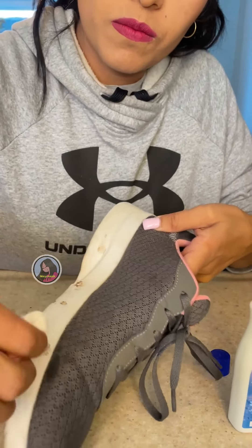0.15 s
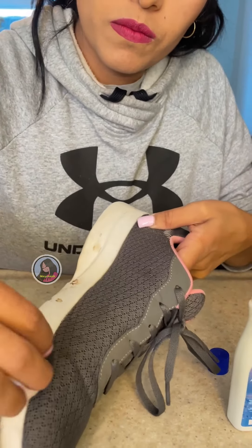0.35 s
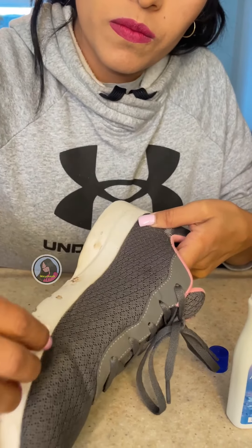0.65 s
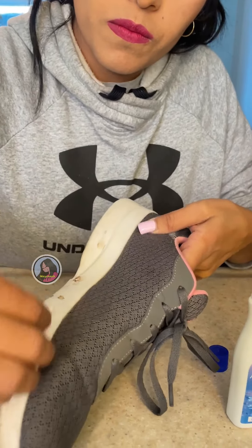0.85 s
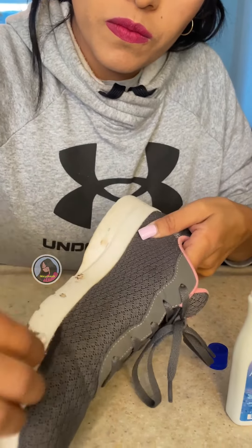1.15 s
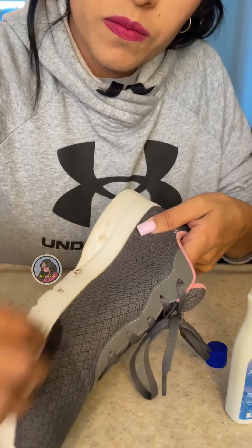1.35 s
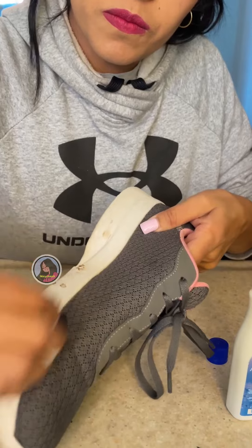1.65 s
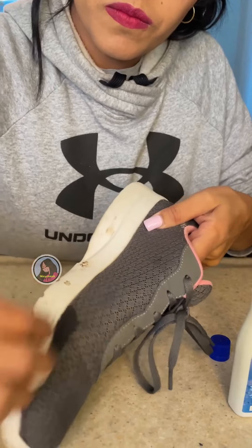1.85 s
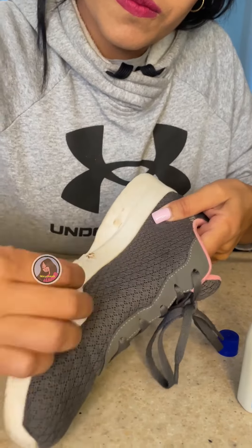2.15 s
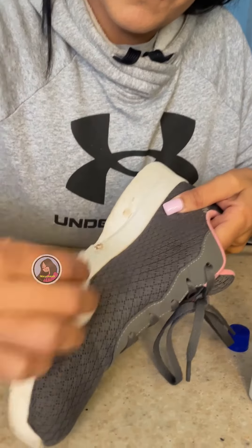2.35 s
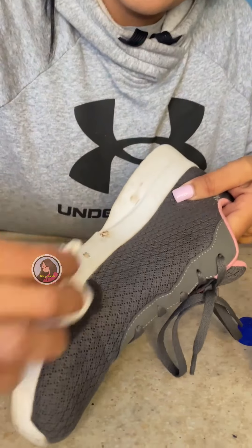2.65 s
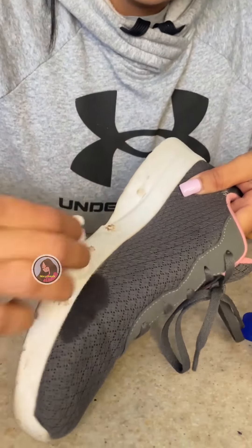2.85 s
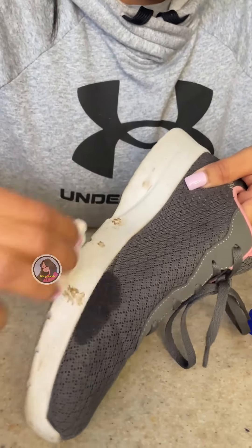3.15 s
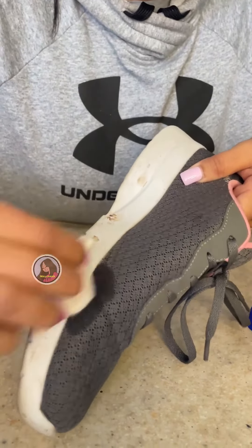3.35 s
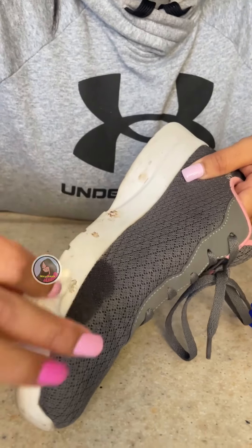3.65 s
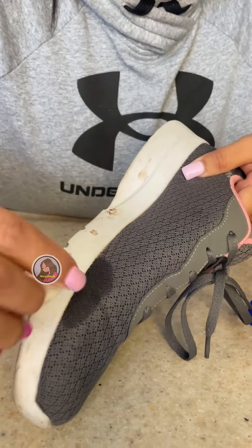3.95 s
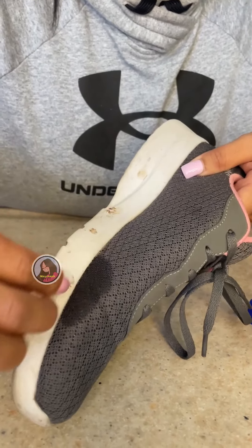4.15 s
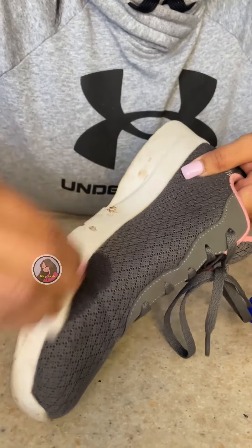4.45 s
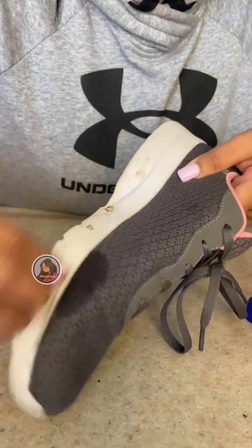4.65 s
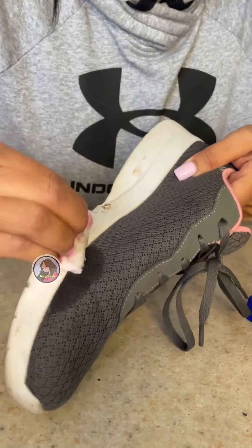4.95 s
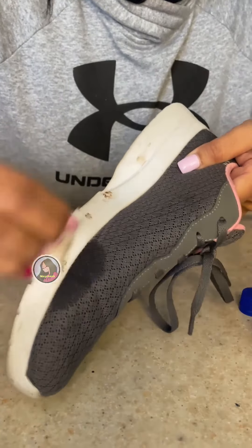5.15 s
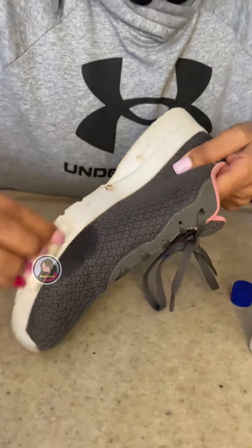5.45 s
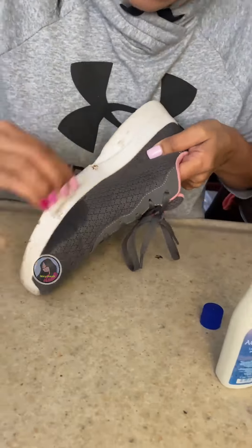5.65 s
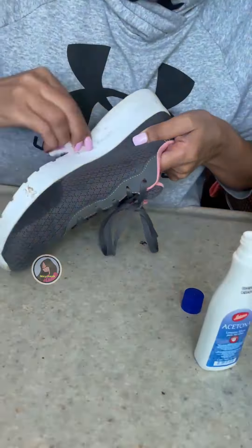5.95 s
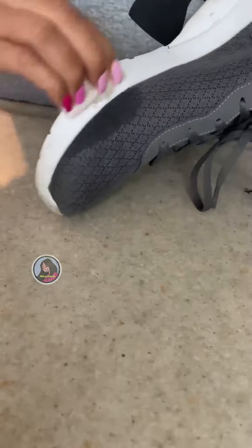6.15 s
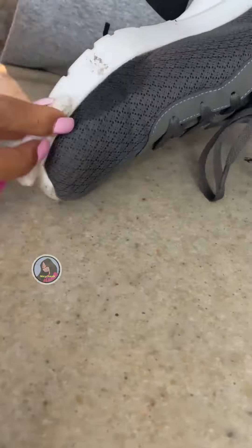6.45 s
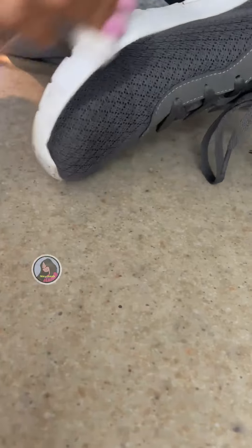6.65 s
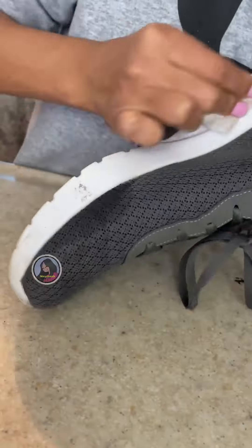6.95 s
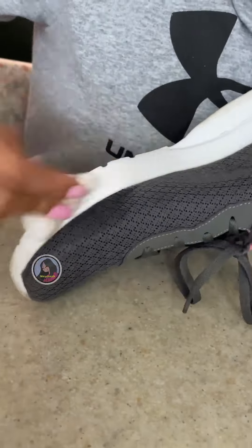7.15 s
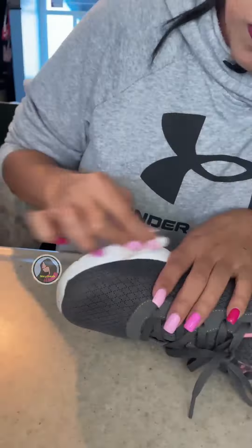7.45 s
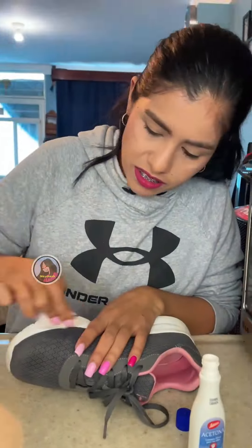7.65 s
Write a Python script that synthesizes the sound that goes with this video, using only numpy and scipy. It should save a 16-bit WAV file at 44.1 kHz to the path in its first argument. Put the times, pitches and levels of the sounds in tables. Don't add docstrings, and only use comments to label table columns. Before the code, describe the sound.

Close up in a kitchen, a cotton pad rubs a rubber shoe sole. A few hesitant wipes settle into an even scrub of about nine strokes a second, with small squeaks and low bumps. It breaks into uneven wipes, resumes, then jumps to sped-up, crowded scuffing with a strong thump and a brief lull. Faint fridge hum and room air sit behind; the close stereo microphone spreads wider near the end.

```python
import sys
import numpy as np
from scipy import signal
from scipy.fft import rfft, irfft, next_fast_len
from scipy.io import wavfile
from scipy.ndimage import uniform_filter1d, map_coordinates

SR = 44100
rng = np.random.default_rng(int(sys.argv[2]) if len(sys.argv) > 2 else 0)


def elevation(decibels):
    levels = np.asarray(decibels, float)
    return 10 ** (levels / 20)


def store_wav(level_fs):
    pcm = np.round(np.clip(np.atleast_2d(level_fs), -1, 1) * 32767)
    wavfile.write(sys.argv[1], SR, pcm.T.astype(np.int16))


N = 343980

CHANGE_S = 5.092
SIZE = next_fast_len(N)
HZ = np.maximum(np.arange(SIZE // 2 + 1) * SR / SIZE, 1)
TIME = np.arange(N) / SR
AFTER = TIME >= CHANGE_S
# (time [s], level [dB])
QUICK_SHOVES = [(5.24, -29.5), (5.68, -38), (5.92, -31.5), (6.11, -31), (6.52, -38), (6.73, -32),
                (6.89, -29), (7.08, -29), (7.19, -24.5), (7.32, -23), (7.412, -16), (7.432, -13),
                (7.49, -20), (7.535, -9.5), (7.572, -17), (7.665, -24)]
QUICK_RISE_DB_S, QUICK_FALL_DB_S = 400, 300


def along(table, column=1):
    rows = np.array(table)
    return np.interp(TIME, rows[:, 0], rows[:, column])


def across(table, at=HZ):
    rows = np.array(table)
    return np.interp(np.log(at), np.log(np.maximum(rows[:, 0], 1)), rows[:, 1])


def unit(x):
    return x / np.sqrt(np.mean(x ** 2))


def colour(x, gain):
    return irfft(rfft(x, SIZE) * gain, SIZE)[..., :N]


def ring(hz, width_hz, at=HZ):
    return 1 / (1 + 1j * (at / hz - hz / at) * hz / width_hz)


def walk(rate, t=TIME):
    knots = rng.standard_normal(int(N / SR * rate) + 3)
    return map_coordinates(knots, [t * rate], order=1) * 1.05


def add(out, s, sound):
    i = int(s * SR)
    out[:, i:i + sound.shape[-1]] += sound[..., :N - i]


def strokes():
    # (time of turn [s], level at the turn [dB],
    # level under way [dB], place of top speed [0-1], pressure [dB])
    loose = [(0.0, -57, -40, .42, -28), (0.16, -42.5, -42, .44, -11.5), (0.292, -65, -45, .55, -22),
             (0.437, -50, -44, .43, -11.5), (0.566, -61, -50, .8, -28), (0.66, -43, -40.5, .5, -26),
             (0.701, -43, -39.5, .3, 0.5), (0.816, -46, -36.5, .58, -1.5), (0.945, -46, -33.5, .54, -10),
             (2.872, -44.5, -30.5, .45, -8), (2.998, -50.5, -58, .5, -12), (3.058, -51, -34, .5, -4.5),
             (3.162, -62, -37, .49, -11.5), (3.278, -50, -56, .21, -23), (3.34, -65, -37.5, .55, -2.5),
             (3.425, -56.5, -36, .43, -8.5), (3.554, -47, -43, .16, -15), (3.615, -69, -71, .64, -8),
             (3.707, -80, -58, .58, -15), (3.79, -50.5, -45.5, .3, -9), (3.983, -82, -64, .37, -28),
             (4.07, -51.5, -49, .52, -17), (4.172, -59, -35, .55, -12), (4.326, -43.5, -31, .6, -12.5)]
    # (time of turn [s], level under way [dB])
    steady = [(1.077, -31.5), (1.195, -30.5), (1.31, -30.5), (1.419, -31), (1.532, -29.5), (1.634, -31),
              (1.744, -31.5), (1.856, -29.5), (1.965, -30.5), (2.075, -30), (2.183, -30), (2.299, -30),
              (2.412, -30.5), (2.526, -28.5), (2.632, -31.5), (2.755, -28.5), (4.438, -29.5), (4.55, -31),
              (4.656, -28), (4.771, -30), (4.878, -28.5), (4.99, -31.5)]
    steady_turn_db = -49.5
    # (time of turn [s], level at the turn [dB],
    # level under way [dB])
    quick = [(5.095, -35.5, -26.5), (5.124, -45, -34), (5.166, -41.5, -34), (5.208, -40, -33.5),
             (5.253, -39.5, -36.5), (5.283, -38, -34), (5.325, -42, -36.5), (5.373, -40.5, -34),
             (5.405, -38.5, -37), (5.458, -39.5, -36), (5.49, -41, -32.5), (5.525, -37, -35),
             (5.557, -41, -36.5), (5.625, -39, -35), (5.675, -38, -33), (5.707, -39.5, -39.5),
             (5.742, -47, -52), (5.768, -49, -36), (5.829, -39.5, -35), (5.939, -39.5, -39),
             (6.029, -42.5, -36), (6.074, -50, -35.5), (6.136, -46, -35.5), (6.173, -42, -40.5),
             (6.251, -47.5, -38.5), (6.283, -39.5, -37), (6.405, -36.5, -35), (6.495, -35, -35.5),
             (6.58, -36, -36.5),
             (6.641, -73, -58), (6.702, -75, -62), (6.785, -55, -30), (6.904, -37, -32.5),
               (6.944, -40.5, -32.5), (6.987, -42, -30), (7.069, -34.5, -32), (7.101, -40, -31.5),
               (7.141, -35.5, -35), (7.16, -35.5, -36), (7.239, -48.5, -36.5), (7.351, -35, -33),
               (7.462, -43, -32), (7.516, -50, -31), (7.583, -30.5, -28), (7.678, -37, -29.5),
               (7.76, -45, -42), (7.8, -36, -40)]
    # (time [s], level [dB])
    weight = [(1.08, -42), (1.9, -36.5), (2.55, -34.5), (2.8, -36.5), (4.4, -38), (5.05, -38.5),
              (5.18, -45), (5.48, -39), (5.72, -42.5), (6.02, -46.5), (6.28, -41.5), (6.6, -45),
              (6.92, -39.5), (7.2, -41), (7.4, -43), (7.6, -38.5)]

    regular = [(s, steady_turn_db, db) for s, db in steady] + quick
    turn, rest_db, top_db = np.transpose(regular)
    place = 0.49 + .003 * np.diff(rest_db, append=rest_db[-1])
    press_db = np.minimum(np.interp(turn, *np.transpose(weight)) - top_db, 3)
    rows = np.vstack([loose, np.c_[turn, rest_db, top_db, place, press_db]])
    return rows[np.argsort(rows[:, 0])].T


def pad_motion():
    turn, rest_db, top_db, place, press_db = strokes()
    k = np.clip(np.searchsorted(turn, TIME) - 1, 0, len(turn) - 2)
    length = turn[k + 1] - turn[k]
    halt = np.minimum(0.0087, 0.093 * length)
    out = (k % 2 == 0) & ~AFTER
    wait = out * 0.0047
    u = np.clip((TIME - turn[k] - halt - wait) / (length - 2 * halt - wait), 0, 1)
    lean = np.log(.5) / np.log(np.clip(.5 + 1.32 * (place[k] - .5), .1, .9))
    arch = np.abs(np.sin(np.pi * u ** lean)) ** np.where(out, 0.45, 0.73)
    rest = elevation(np.interp(TIME, turn, rest_db))
    speed = rest + np.maximum(elevation(top_db[k] - 0.18) - rest, 0) * arch
    spot = (u - .5) * (-1.) ** k
    press = elevation(press_db[k])
    return uniform_filter1d(speed, size=130), spot, uniform_filter1d(press, size=1400)


def scrub():
    # (frequency [Hz], density [dB per Hz])
    pad_slow = [(500, -30), (900, -16), (1700, -8.5), (2300, -4.5), (3000, -5), (4300, -4.5), (5000, -1),
                (5250, -2), (6200, -1.5), (8500, -3), (11500, -4.5), (13800, -10), (15300, -13),
                (15600, -7)]
    # (frequency [Hz], density [dB per Hz])
    pad_fast = [(300, -40), (450, -8), (700, -2.5), (818, -12), (1100, -1), (1260, -10.5), (2080, -9),
                (4540, -7), (6110, -5), (9630, -4), (12200, -5.5), (15600, -12.5)]
    # (frequency [Hz], width [Hz], level [dB])
    sole_slow = [(1214, 88, 9.5), (1025, 114, 5.5), (1310, 120, -2.5), (1800, 340, -2.5), (2280, 580, -12)]
    # (frequency [Hz], width [Hz], level [dB])
    sole_fast = [(1100, 210, 6.4), (1400, 380, 1.3)]
    # (frequency [Hz], width [Hz], level [dB])
    sole_edge = [(3140, 200, -16), (4240, 250, 0), (5325, 250, 2), (7300, 510, -5.5)]

    speed, spot, press = pad_motion()
    slips = rng.standard_normal((2, N)) * elevation(1.6 * rng.exponential(size=(2, N)))
    slips = slips * elevation(1.55 * walk(150))
    f, t, spec = signal.stft(unit(slips), SR, nperseg=512)
    f = np.maximum(f, 1)[:, None]
    i = np.minimum(t * SR, N - 1).astype(int)
    after = AFTER[i]

    slow, fast = elevation(across(pad_slow, f)), elevation(across(pad_fast, f))
    hiss = np.where(after, unit(fast), unit(slow))
    hiss = hiss * (press[i] / elevation(-8.0)) ** (.5 / (1 + (f / 3000) ** 4))
    hiss = hiss * np.clip(speed[i] / elevation(-32.5), .05, 1) ** (0.4 / (1 + (11000 / f) ** 4))

    def modes(table, wander, slide, swell_db):
        power = 0
        for hz, width, db in table:
            swell = elevation(db + swell_db * walk(14, t))
            pitch = hz * (1 + wander * walk(8.2, t) + slide * spot[i])
            power = power + np.abs(swell * ring(pitch, width, f)) ** 2
        return power

    sole = np.where(after, modes(sole_fast, 0.027, .03, 1.6), modes(sole_slow, .03, 0.12, 1.8))
    edge = np.where(after, .4, 1.1) * modes(sole_edge, 0.012, 0.03, 2.4)
    power = hiss ** 2 * (1 + edge) + (elevation(6.0) * press[i]) ** 2 * sole
    grain = rng.standard_normal((60, 200))
    patches = map_coordinates(grain, np.broadcast_arrays(f / 400, t[None] * 24), order=1)
    rubbed = signal.istft(spec * np.sqrt(power) * elevation(2.2 * patches), nperseg=512)[1][:, :N]
    return elevation(0.94) * speed * rubbed


def air():
    # (frequency [Hz], density [dB per Hz])
    air_tone = [(100, -4), (250, -8.5), (420, -18), (750, -24), (1000, -33), (1500, -43.5), (3000, -45.5),
                (6000, -55), (10000, -48), (15500, -59)]
    # (time [s], level [dB])
    handling = [(0, -40.5), (.3, -56), (.85, -48.5), (2.0, -51.5), (2.9, -47), (3.6, -53), (4.3, -49.5),
                (5.15, -46), (5.75, -53.5), (6.3, -48.5), (7.3, -46.5), (7.62, -28.5), (7.8, -36)]

    noise = rng.standard_normal((2, N))
    handling_db = along(handling)
    low_cut = HZ ** 2 / (HZ ** 2 + 190 ** 2)
    still = unit(colour(noise, elevation(across(air_tone)) * np.abs(ring(3100, 33000)) * low_cut))
    still = still * elevation(-45.5 + 1.16 * walk(7.9) + np.where(AFTER, -2.5, 0))
    boom = unit(colour(noise, np.abs(ring(83.3, 32)) ** 2))
    boom = boom * elevation(handling_db + 4.5 + 3.3 * walk(12))
    drone = unit(colour(noise, np.abs(ring(144.0, 77.4)) ** 2))
    drone = drone * elevation(-42.5 + 0.43 * (handling_db + 47.5) + 3.3 * walk(12))
    deep = unit(colour(noise, np.abs(ring(34, 24)) ** 3))
    shove_db = shoved(QUICK_SHOVES, QUICK_RISE_DB_S, QUICK_FALL_DB_S)
    deep = deep * elevation(np.where(AFTER, 0.6 * shove_db - 18.0, -52))
    return still + boom + drone + deep


def fridge():
    # (frequency [Hz], level [dB], start [s], stop [s])
    motor_lines = [(53.8, -30, 0, 5.09), (135, -42, 3.1, 5.3), (211, -50, 2, 5.1), (230, -48, 0, 2.4),
                   (320, -50, 2.9, 3.7), (419, -59, 0, 6), (472, -58, 0, 6), (512, -61, 0, 6),
                   (576, -51.5, 0, 6), (682, -62, 0, 6), (733, -60, 0, 6)]
    hum = 0
    for hz, db, start, stop in motor_lines:
        left_s = (stop - TIME) * min(30 / hz, 1) * 2
        on = np.clip(np.minimum(TIME - start + 0.11, left_s) / 0.12, 0, 1)
        shaky = min(hz / 300, 1)
        level = elevation(db + 3 + 1.24 * shaky * walk(6))
        hum = hum + on * level * np.sin(2 * np.pi * hz * TIME + (0.29 + 1.11 * shaky) * walk(5))
    return hum * elevation(np.array([[.2], [-.2]]))


def shoved(table, rise_db_s, fall_db_s):
    # (time [s], level [dB])
    tremble = [(0, -45), (5.09, -43.5), (5.1, -48), (5.35, -32.5), (5.65, -38.5), (6.5, -42.5), (7.3, -37),
               (7.8, -37)]
    total = elevation(along(tremble))
    for s, db in table:
        total = total + elevation(db + np.minimum((TIME - s) * rise_db_s, (s - TIME) * fall_db_s))
    return 20 * np.log10(total)


def counter():
    # (time [s], level [dB])
    shoves = [(0.08, -34), (0.57, -40), (0.79, -38), (1.01, -31), (1.3, -36), (1.62, -34), (1.88, -33),
              (2.08, -30), (2.41, -36), (2.6, -35), (2.85, -31.5), (3.3, -36), (3.6, -31), (3.85, -32),
              (4.15, -32), (4.4, -33), (4.65, -31), (4.82, -27), (5.07, -23.5)]
    # (time [s], frequency [Hz], right leads by [radians])
    sway_tone = [(5.1, 59, 1.2), (5.22, 54.75, .5), (5.8, 53.1, 0.85), (6.75, 54.57, 0.99),
                 (6.9, 58.9, 1.15), (7.2, 61.26, 1.5), (7.45, 65.3, 1.63), (7.8, 64.5, 1.3)]

    shake_db = shoved(shoves, 150, 87) + 2.0 + 0.93 * walk(47)
    shake = np.sin(2 * np.pi * 67 * TIME + 1.52 * walk(9)) * elevation(shake_db)
    phase = 2 * np.pi * np.cumsum(along(sway_tone)) / SR
    side_phase = np.array([0.47 * walk(8), along(sway_tone, column=2)])
    sway_db = shoved(QUICK_SHOVES, QUICK_RISE_DB_S, QUICK_FALL_DB_S) + np.array([[5.5], [3.5]])
    sway = np.sin(phase + side_phase) * elevation(sway_db)
    return np.where(AFTER, sway, shake)


def bumps():
    # (time [s], level [dB], pitch [Hz], left minus right [dB])
    shoe_bumps = [(0.136, -21, 110, 0), (.78, -30, 140, 3), (.87, -30, 125, 1), (.905, -28, 150, 1),
                  (1.675, -23, 137, 1.0), (1.869, -34, 164, 1.5), (2.084, -27.5, 133, 1.5),
                  (2.319, -29, 146, -1), (2.541, -30.5, 156, 0), (2.844, -23, 132, 1.5),
                  (3.031, -35, 108.5, -4), (3.844, -22, 112, 0), (4.086, -26.5, 117, 0),
                  (4.673, -20, 115, -1), (4.879, -27.5, 129, 0.5), (5.481, -26.5, 115, 1),
                  (5.535, -27.5, 127, 5), (5.884, -29.5, 175, 5), (6.103, -11.5, 136, 3.5),
                  (6.114, -19, 150, 1), (6.56, -30, 170, 3), (6.6, -30, 160, 2), (6.505, -29, 125, 3),
                  (6.517, -20.5, 138.5, 5), (6.83, -32, 135, 4), (7.619, -26, 155, 3),
                  (7.68, -19.5, 109, -1), (7.765, -25, 135, 1), (7.782, -21, 146, 2), (7.352, -27, 160, 3)]
    modes = [(0.996, 4.5, 0.059), (1.805, -3.5, 0.051), (2.91, -21, 0.02), (4.07, -20, 0.02),
             (5.45, -26, 0.017), (11, -32, .02), (0.507, -12.0, 0.11)]
    out, t = np.zeros((2, N)), np.arange(int(.12 * SR)) / SR
    for s, db, hz, pan_db in shoe_bumps:
        rise, lead = (.013, 2.2) if s > CHANGE_S else (.004, .1)  # seconds, radians
        thud = 0
        for m, m_db, t60 in modes:
            decay = elevation(m_db - 60 * np.maximum(t - rise, 0) / t60)
            thud = thud + decay * np.sin(2 * np.pi * m * hz * t + np.array([[0], [lead / max(m, 1)]]))
        side_db = np.array([[pan_db], [-pan_db]]) / 2
        add(out, s - .003, thud * np.minimum(t / rise, 1) * elevation(db + 1.0 + side_db))
    return out


def ticks():
    # (time [s], level [dB], pitch [Hz])
    nail_ticks = [(.166, -32, 6500), (.67, -28, 5460), (.67, -31, 7300), (.932, -26.5, 560),
                  (2.521, -39, 5170), (3.26, -28, 10360), (3.285, -25, 10700), (3.285, -34, 14600),
                  (3.285, -35, 7600), (3.285, -40, 4500), (.67, -36, 12500), (3.301, -40, 10600),
                  (3.842, -33, 900), (3.842, -36, 2500), (4.211, -36, 1800), (5.72, -33, 1330),
                  (7.786, -36, 1100), (7.788, -38, 1900)]
    out, t = np.zeros((2, N)), np.arange(int(.06 * SR)) / SR
    for s, db, hz in nail_ticks:
        snap = np.sin(2 * np.pi * hz * t) * elevation(-60 * t / (0.0042 + 16 / hz))
        wisp = 0.075 * hz / 10000 * rng.standard_normal(len(t)) * elevation(-60 * t / 0.015)
        add(out, s, elevation(db + 3.5) * (snap + wisp) * np.array([[1], [0]]))
    return out


def squeals():
    # (time [s], length [s], level [dB], pitch [Hz], glide [share of pitch])
    rubber_squeals = [(.74, .04, -46, 1300, 0.072), (1.255, .05, -41, 1200, 0.0076),
                      (1.36, .04, -40, 1250, 0.007), (1.585, .04, -38, 1233, 0.007),
                      (1.72, .04, -43, 1196, 0), (1.81, .05, -44, 1200, 0), (1.92, .05, -37.5, 1126, 0),
                      (2.02, .05, -40, 1250, -0.0083), (2.24, .04, -40, 2200, 0),
                      (2.365, .06, -36, 1290, -0.084), (2.465, .05, -39, 1166, 0.046),
                      (2.582, .05, -35.5, 1120, 0.13), (2.7, .06, -38, 1150, .12),
                      (2.82, .06, -35.5, 1198, -0.028), (.72, .04, -46, 1800, 0), (.79, .05, -45, 1700, 0),
                      (.88, .05, -45, 1800, 0), (6.86, .04, -43, 1050, 0), (6.92, .05, -41, 1080, 0),
                      (7.02, .05, -41, 1100, 0), (7.085, .04, -41, 1050, 0), (7.14, .04, -43, 1080, 0),
                      (7.2, .04, -43, 1100, 0), (7.56, .04, -40, 1120, 0), (7.64, .03, -39, 1000, 0),
                      (7.725, .04, -40, 1020, 0), (7.793, .025, -37, 1080, 0),
                      (7.792, .025, -39, 1900, 0.0046)]
    out = np.zeros((2, N))
    shake = 1.4 * np.array([walk(90), walk(90)])
    for s, length, db, hz, glide in rubber_squeals:
        u = np.arange(int(length * SR)) / (length * SR)
        i = np.minimum(int(s * SR) + np.arange(len(u)), N - 1)
        phase = 2 * np.pi * np.cumsum(hz * (1 + glide * (u - .5))) / SR
        tone = np.sin(phase + shake[:, i]) * np.sin(np.pi * u)
        add(out, s - length / 2, tone * elevation(db + 3.5 + np.array([[0], [-6]])))
    return out


def ports(a, b):
    # (frequency [Hz], left leads by [radians])
    port_lead = [(800, 0), (1400, .5), (2250, .6), (2750, 1.9), (3100, .6), (4100, .3), (4700, .8),
                 (5000, 0), (7650, 3.14), (10700, 6.05), (11400, 6.5), (13600, 9.2), (14800, 9.6),
                 (15600, 10.32)]
    # (frequency [Hz], likeness [0-1])
    port_like = [(50, .99), (250, .9), (700, .42), (1200, .88), (2000, .7), (2750, .45), (4100, .62),
                 (4700, .45), (5200, .72), (7600, .87), (11000, .88), (12600, .7), (14200, .88)]
    # (frequency [Hz], left minus right [dB])
    port_tilt = [(100, -0.5), (300, 2), (700, 3), (1250, 4), (2300, 1), (4400, 0), (6000, 0.4),
                 (15000, 2.5)]

    like = np.clip(across(port_like), 0, 1)
    lean = elevation(across(port_tilt) / 2) * np.exp(.5j * across(port_lead))
    same, apart = np.sqrt((1 + like) / 2), np.sqrt((1 - like) / 2)
    left = colour(a, same * lean) + colour(b, apart * lean)
    right = colour(a, same / lean) + colour(b, -apart / lean)
    return np.where(AFTER, [a, b], [left, right])


def scene():
    fade = np.where(AFTER, np.clip((TIME - CHANGE_S) / 0.031, .1, 1), 1)
    close = ports(*(scrub() + air() + ticks() + squeals()))
    return (close + fridge() + counter() + bumps()) * fade


def thin_bands(stereo):
    pair = np.array([stereo[0] + stereo[1], stereo[0] - stereo[1]]) / 2
    spec = signal.stft(pair, nperseg=2048, noverlap=1024)[2]
    fine = np.abs(spec) ** 2
    band = np.arange(spec.shape[1]) // 16
    power = np.add.reduceat(fine, np.arange(0, spec.shape[1], 16), axis=1)
    power = uniform_filter1d(power, size=2, axis=2)
    covered = (power < power[::-1] * elevation(-14.0))[:, band] & (band >= 5)[:, None]
    narrow = uniform_filter1d(fine, size=7, axis=1)
    wide = uniform_filter1d(narrow, size=64, axis=1)
    dip = elevation(np.where(band < 15, -8.2, -10.5)[:, None])
    covered |= (narrow < wide * dip) & (band >= 6)[:, None]
    mid, side = signal.istft(spec * ~covered, nperseg=2048, noverlap=1024)[1][:, :N]
    return np.array([mid + side, mid - side])


def roll_off(x):
    return signal.sosfilt(signal.butter(12, 15710, fs=SR, output="sos"), x)


def record(dry):
    mix = thin_bands(colour(dry, 1 / (1 + (26 / HZ) ** 4)))
    return roll_off(mix)


dry = scene()
out = record(dry)
store_wav(out)
```